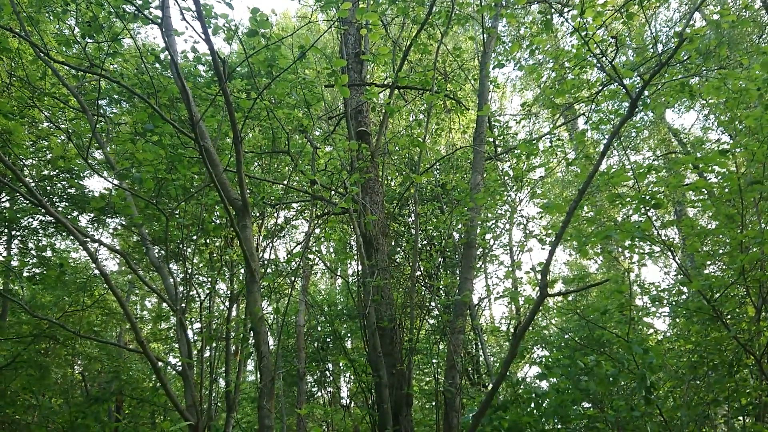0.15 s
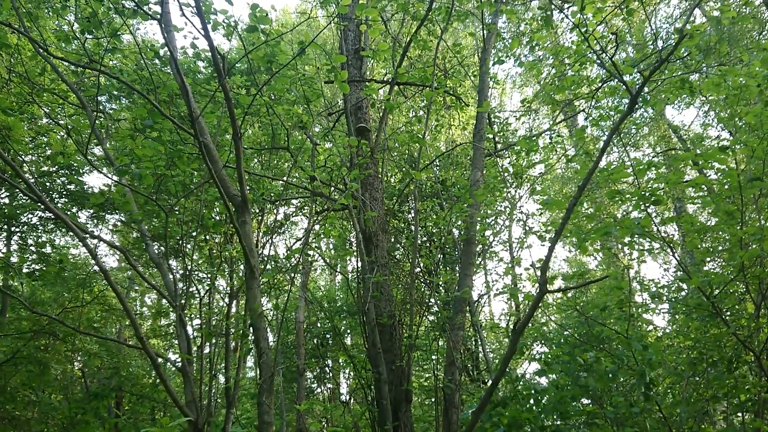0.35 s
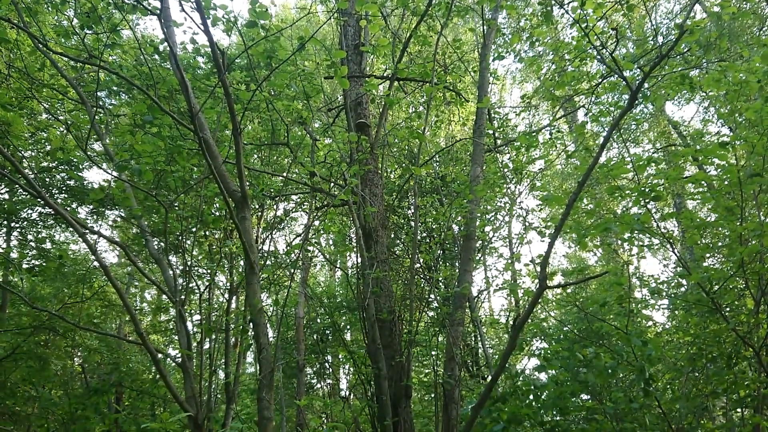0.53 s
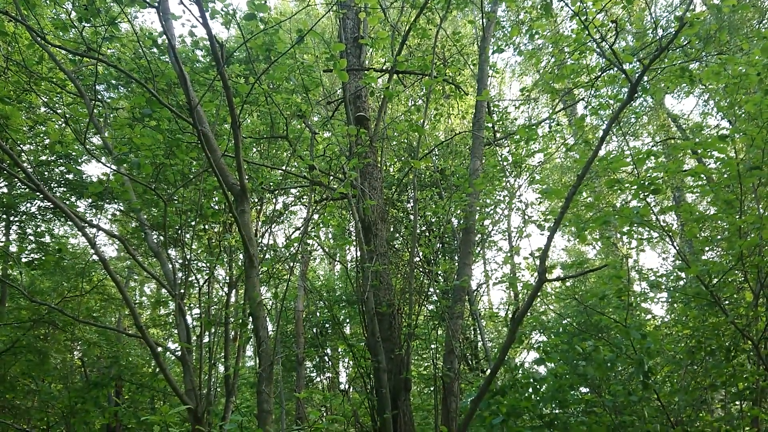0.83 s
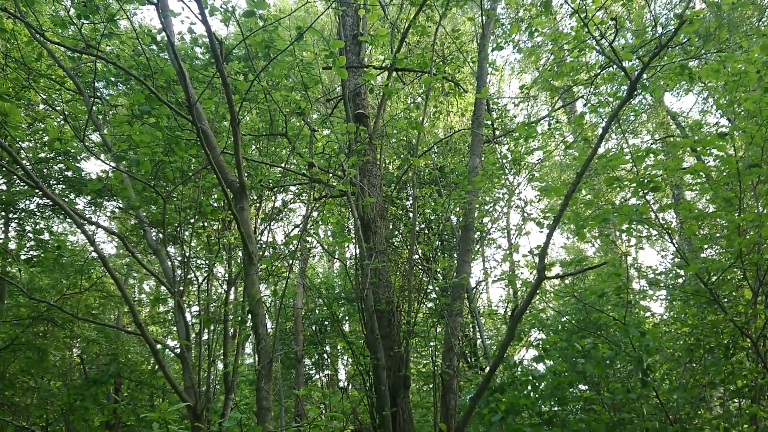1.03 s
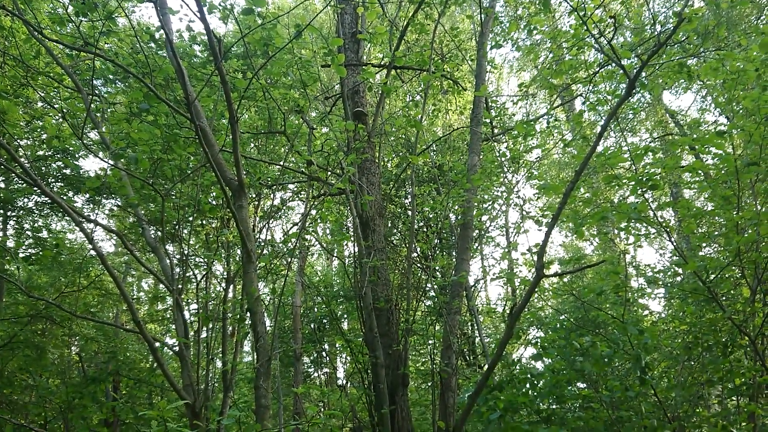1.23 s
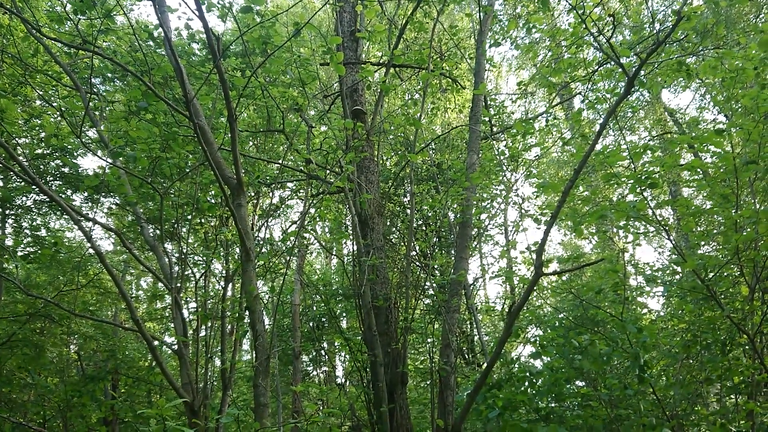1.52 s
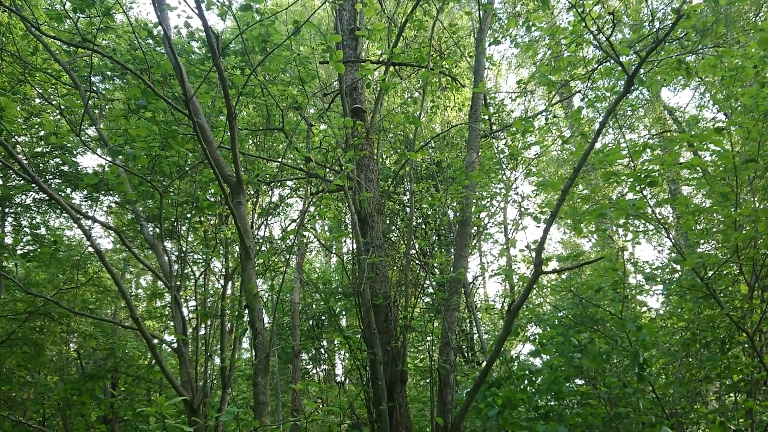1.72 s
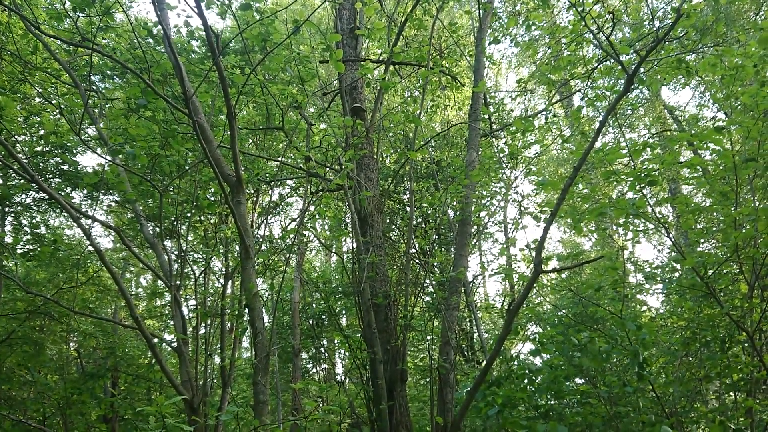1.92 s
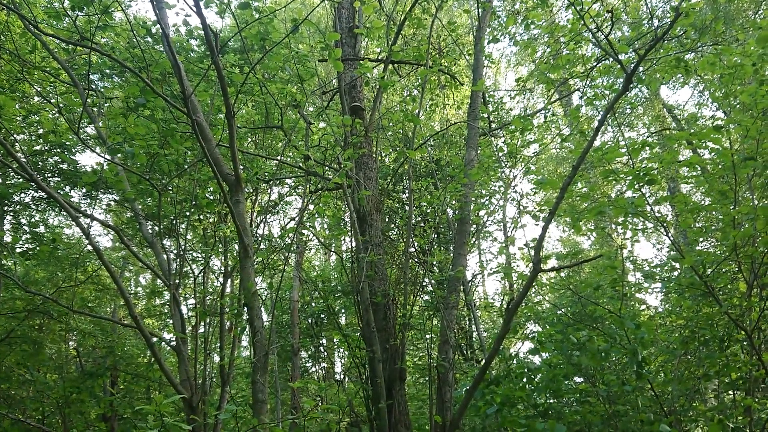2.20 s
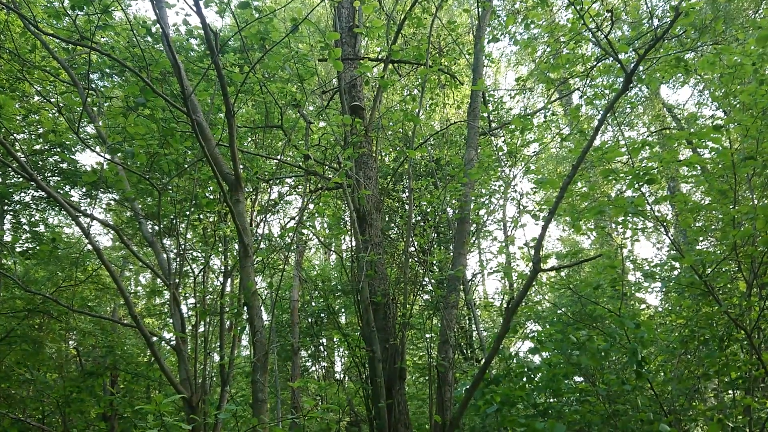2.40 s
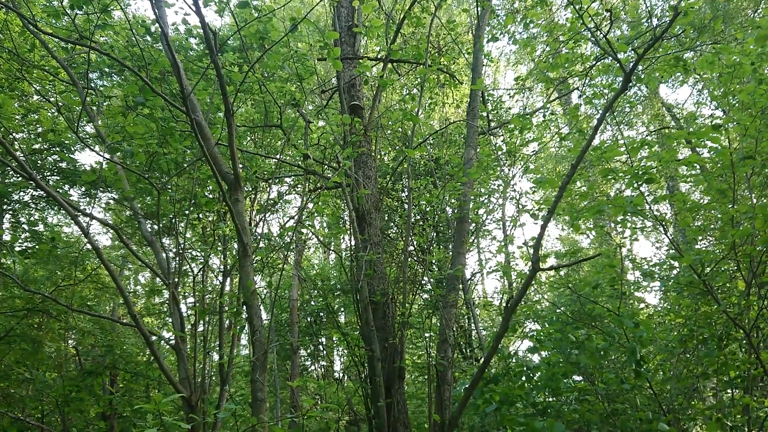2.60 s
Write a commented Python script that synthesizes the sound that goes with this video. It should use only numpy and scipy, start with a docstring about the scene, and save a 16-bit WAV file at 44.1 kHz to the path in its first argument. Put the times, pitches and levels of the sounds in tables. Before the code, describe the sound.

Two clear, hollow cuckoo calls ring among forest trees, over soft air and sparse distant chirps.

```python
"""Cuckoo in a leafy wood

A cuckoo calls twice: a short arched "cuck", then a longer, lower "coo", each a gliding sine with a faint octave.
Trunks and stands of trees echo each note as delayed copies; decaying noise spreads it into the wood's long tail.
Small birds whistle further off, as quick pitch slides that also set the wood ringing.
One small tick near the microphone is a few dying sines. Soft air, high hiss and a low rumble are coloured noise.
"""
import sys
import numpy as np
from scipy import signal
from scipy.fft import rfft, irfft, next_fast_len
from scipy.io import wavfile
from scipy.ndimage import map_coordinates

SR = 44100
rng = np.random.default_rng(int(sys.argv[2]) if len(sys.argv) > 2 else 0)


def materialize(psi):
    """Save the field psi as 16-bit PCM at rate SR to the path in sys.argv[1].

    A 1-D psi becomes a single channel; in a 2-D psi each row is a channel.
    """
    bounded = np.clip(np.atleast_2d(psi).T, -1, 1)
    quanta = np.round(bounded * 32767).astype(np.int16)
    wavfile.write(sys.argv[1], SR, quanta)


N = 121275
TIME = np.arange(N) / SR  # seconds

# In every left-right balance, a positive value means the left is louder.
# The cuckoo's calls: [start t/s, level/dB, delay of the coo t/s, length of the coo over its usual length]
CUCKOO_CALLS = [(.222, -0.5, .417, .98), (1.789, -0.5, .421, 1.03)]
# How each note glides and swells, before stretching and call level: [time from note start t/s, pitch f/Hz, level/dB]
CUCK_SHAPE = [(0, 525, -58), (.012, 572, -46), (.027, 660, -36), (.042, 698, -33), (.062, 682, -32.8),
              (.085, 655, -31.8), (.1, 620, -36.5), (.115, 585, -49)]
COO_SHAPE = [(0, 495, -54), (.018, 535, -42), (.048, 543, -35.5), (.1, 540, -37), (.15, 537, -39.5),
             (.19, 533, -38), (.215, 518, -44), (.26, 482, -52)]
# Trees that throw the call back, near to far: [delay t/s, level/dB, left-right balance level/dB]
TREE_ECHOES = [(.0456, -14, -7), (.07, -17, 1.5), (.0907, -16, -16), (.1289, -29, -9), (.2063, -18, 3),
               (.2433, -18.5, -8), (.3428, -25, -9.5), (.445, -21, -8)]
# Small birds' slurred whistles: [start t/s, length t/s, first pitch f/Hz, last pitch f/Hz, bend (no unit),
# level/dB, wood's answer level/dB, left-right balance level/dB]
BIRD_WHISTLES = [(-.04, 0.146, 2137, 2073, 2.2, -69.5, 4.5, -11.5),
                 (0.599, 0.15, 2260, 1977, 2.05, -67, 6, -7),
                 (0.799, 0.084, 8250, 6720, 2.8, -69.5, 10.5, -4),
                 (0.979, 0.091, 3100, 3770, 0.25, -77, 15.5, -3),
                 (1.189, .085, 2950, 4170, 0.492, -63, 4.5, -4),
                 (1.331, .22, 8770, 8000, 1.3, -84.5, 5, -8), (1.5, 0.35, 8100, 7940, 2.36, -78.5, 1, 2.5),
                 (2.61, 0.031, 4550, 3620, .1, -64.5, -3, -8)]
# How long the wood rings at each pitch: [f/Hz, time to fall by 60 dB t/s]
WOOD_DECAY = [(550, 1.68), (700, 2.9), (2000, 2.6), (4000, 1.2), (8000, 0.81)]
# The tick's ringing tones: [f/Hz, level/dB, time to fall by 60 dB t/s]
TICK_TONES = [(520, -6.5, 0.029), (865, 2.5, 0.008), (1860, -5, 0.009)]
# Colours of the background noises, before each is set to its own loudness: [f/Hz, relative level/dB]
AIR_COLOUR = [(100, -11), (160, -4.5), (260, -3.5), (420, 1), (800, -2), (1200, -3.5), (1600, -6),
              (2000, -6.5), (2500, -11.5), (3600, -8.5), (5000, -15), (6300, -18), (7700, -16), (8300, -39),
              (11000, -36)]
RUMBLE_COLOUR = [(22, -45), (33, -31), (50, -10), (68, 1), (95, -3.5), (130, -8.5), (200, -19.5),
                 (400, -49)]
HISS_LEFT_COLOUR = [(6000, -27), (12500, -53), (13800, 10), (15500, 18), (17000, -45)]
HISS_RIGHT_COLOUR = [(6000, -29), (8500, -4.5), (11000, -1), (13000, -0.5), (15500, 2.5), (17000, -11)]
# How alike the air is in left and right: [f/Hz, likeness (1 = the same, 0 = unrelated)]
AIR_LIKENESS = [(150, 0.84), (400, 0.54), (1000, 0.05), (2000, 0.011)]
# The rumble's rise and fall, before a small lift and random drift: [t/s, level/dB]
RUMBLE_COURSE = [(0.0, -67), (0.07, -66), (0.11, -61), (0.14, -63.5), (0.3, -74), (0.35, -66.5),
                 (0.47, -71), (1.82, -72), (1.99, -66.5), (2.01, -69), (2.07, -67), (2.75, -64.5)]

CUCK_OCTAVE_DB, COO_OCTAVE_DB = -36.5, -27.5  # second harmonic against the main tone
CUCK_PAN_DB, COO_PAN_DB = -4.5, -2  # left minus right
SCATTER_DB, SCATTER_PAN_DB = -7.5, -5  # the wood's answer to the cuckoo
CUCKOO_BUILD_S, WHISTLE_BUILD_S = 0.045, 0.0073  # how slowly the scatter builds up
WHISTLE_EDGE = 0.15  # share of the length that fades at each end
WHISTLE_WAVER = 0.00312  # pitch unsteadiness, as a share of the pitch
FLICKER_DB = 3  # size of the random flicker in whistle level
TICK_S, TICK_DB = 0.0712, -43
AIR_DB, HISS_LEFT_DB, HISS_RIGHT_DB = -60.5, -82, -73.5
LOW_CUT_HZ, TOP_HZ = 36, 15800


def amp(db):
    """Turn decibels into a gain."""
    return 10 ** (np.asarray(db) / 20)


def unit(x):
    """Scale a sound to an rms (average strength) of 1."""
    return x / np.sqrt(np.mean(x ** 2) + 1e-20)


def along(points, hz):
    """Read a curve of (frequency, value) points on a log frequency axis."""
    point_hz, values = np.transpose(points)
    return np.interp(np.log(hz + 1), np.log(point_hz + 1), values)


def wobble(rate):
    """Draw a smooth curve through random points, `rate` points a second."""
    knots = rng.standard_normal(int(N * rate / SR) + 4)
    return map_coordinates(knots, [TIME * rate])


def filtered(x, response):
    """Multiply the spectrum of x by a gain that depends on frequency."""
    size = next_fast_len(N + SR // 2)  # spare room so the end does not wrap onto the start
    hz = np.fft.rfftfreq(size, 1 / SR)
    return irfft(rfft(x, size) * response(hz), size)[..., :N]


def pan(balance_db):
    """Left and right gains that differ by balance_db and have a mean of 1."""
    gains = amp([[balance_db / 2], [-balance_db / 2]])
    return gains / gains.mean()


def mix_angle(alike):
    """Angle that shares sound between middle and side to give the wanted left-right likeness."""
    return np.arccos(np.clip(alike, -1, 1)) / 2


def note(shape, start, stretch, octave_db):
    """One hooted note: a gliding, slightly unsteady sine with a faint octave above it."""
    s, hz, db = np.transpose(shape)
    s = start + stretch * s
    pitch = np.interp(TIME, s, hz) * (1 + 0.0024 * wobble(80))
    phase = 2 * np.pi * np.cumsum(pitch) / SR
    gate = np.clip(np.minimum(TIME - s[0], s[-1] - TIME) / 0.0022, 0, 1)  # 2.2 ms fades
    tone = np.sin(phase) + amp(octave_db) * np.sin(2 * phase)
    return gate * amp(np.interp(TIME, s, db)) * tone


def wood(x, alike, build_s):
    """Scatter from trunks and leaves: noise that builds up, then dies at a pace set for each pitch."""
    mid, side = rng.standard_normal((2, 2 * SR))
    angle = mix_angle(alike)
    stereo = np.cos(angle) * mid + np.sin(angle) * np.array([side, -side])
    hz, t, spectrum = signal.stft(stereo, SR, nperseg=256)
    decay = amp(-60 * t / along(WOOD_DECAY, hz)[:, None])
    shape = decay * (1 - np.exp(-(t / build_s) ** 2))
    # Give every pitch the same total energy
    shape /= np.sqrt(np.sum(shape ** 2, axis=1, keepdims=True) * t[1] * SR)
    tail = signal.istft(spectrum * shape, SR, nperseg=256)[1]
    return signal.fftconvolve(x[None], tail, axes=1)[:, :N]


def cuckoo():
    """Two calls from one perch: direct notes, delayed copies from the trees, and the wood's tail."""
    cuck, coo = np.zeros((2, N))
    for start, db, delay, stretch in CUCKOO_CALLS:
        cuck += amp(db) * note(CUCK_SHAPE, start, 0.99, CUCK_OCTAVE_DB)
        coo += amp(db) * note(COO_SHAPE, start + delay, stretch, COO_OCTAVE_DB)
    voice = cuck + coo
    direct = pan(CUCK_PAN_DB) * cuck + pan(COO_PAN_DB) * coo
    echoes = np.zeros((2, N))
    for delay, db, pan_db in TREE_ECHOES:
        echoes += amp(db) * pan(pan_db) * np.interp(TIME - delay, TIME, voice)
    scatter = amp(SCATTER_DB) * pan(SCATTER_PAN_DB) * wood(voice, alike=0.47, build_s=CUCKOO_BUILD_S)
    return direct + echoes + scatter


def small_birds():
    """Whistled sines whose pitch moves fastest at first, then settles towards its last value."""
    out = np.zeros((2, N))
    for start, length, first_hz, last_hz, bend, db, wet_db, pan_db in BIRD_WHISTLES:
        progress = np.clip((TIME - start) / length, 0, 1)
        slide = np.expm1(-bend * progress) / np.expm1(-bend)  # 0 to 1
        hz = first_hz + (last_hz - first_hz) * slide
        edge = np.clip(np.minimum(progress, 1 - progress) / WHISTLE_EDGE, 0, 1)
        swell = np.sin(np.pi / 2 * edge)
        level = amp(db + FLICKER_DB * wobble(120))
        phase = 2 * np.pi * np.cumsum(hz * (1 + WHISTLE_WAVER * wobble(90))) / SR
        voice = level * swell * np.sin(phase)
        answer = amp(wet_db) * wood(voice, alike=0.022, build_s=WHISTLE_BUILD_S)
        out += pan(pan_db) * (voice + answer)
    return out


def tick():
    """A small dry tick close by: a few tones start together and quickly die away."""
    t = np.maximum(TIME - TICK_S, 0)
    tones = np.zeros(N)
    for hz, db, t60 in TICK_TONES:
        tones += amp(TICK_DB + db - 60 * t / t60) * np.sin(2 * np.pi * hz * t)
    return pan(-4.5) * tones


def noise(colour, alike):
    """Coloured stereo noise of rms 1; shared and opposite parts set how alike left and right are."""
    def response(hz):
        angle = mix_angle(along(alike, hz))
        return amp(along(colour, hz)) * [np.cos(angle), np.sin(angle)]

    mid, side = filtered(rng.standard_normal((2, N)), response)
    return unit(np.array([mid + side, mid - side]))


def forest_air():
    """Soft, nearly steady noise of the air in the wood."""
    level = amp(AIR_DB + 0.15 * wobble(4.08))
    return level * noise(AIR_COLOUR, AIR_LIKENESS) * pan(-2.5)


def low_rumble():
    """Deep noise, stronger on the right, that swells and sinks unevenly."""
    level_db = np.interp(TIME, *np.transpose(RUMBLE_COURSE)) + 0.86 * wobble(11.7)
    return amp(level_db + 0.47) * noise(RUMBLE_COLOUR, [(60, 0.26)]) * pan(-17.5)


def high_hiss():
    """Steady high hiss: very thin and faint on the left, broader and louder on the right."""
    sides = []
    for db, colour in ((HISS_LEFT_DB, HISS_LEFT_COLOUR), (HISS_RIGHT_DB, HISS_RIGHT_COLOUR)):
        hiss = filtered(rng.standard_normal(N), lambda hz: amp(along(colour, hz)))
        sides.append(amp(db) * unit(hiss))
    return np.array(sides)


def scene():
    """Add up everything, from the cuckoo to the background."""
    return cuckoo() + small_birds() + tick() + forest_air() + low_rumble() + high_hiss()


def record(dry):
    """Cut the deepest bass smoothly and remove everything from TOP_HZ up."""
    return filtered(dry, lambda hz: (1 - np.exp(-(hz / LOW_CUT_HZ) ** 6)) * (hz < TOP_HZ))


dry = scene()
out = record(dry)
materialize(out)
```